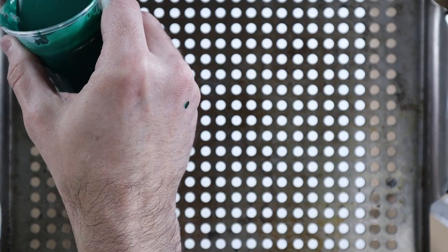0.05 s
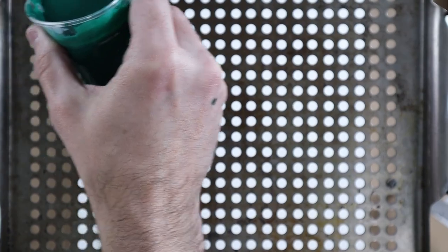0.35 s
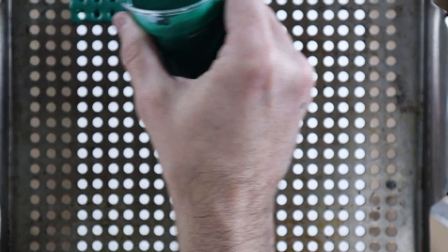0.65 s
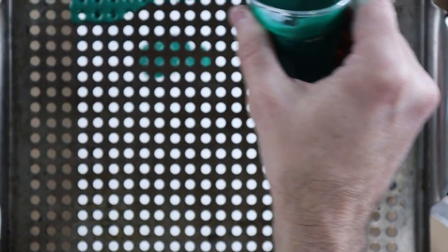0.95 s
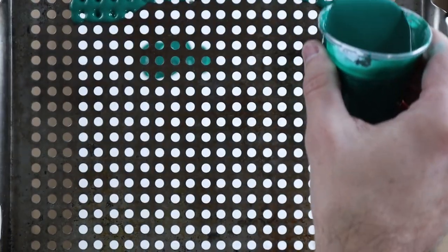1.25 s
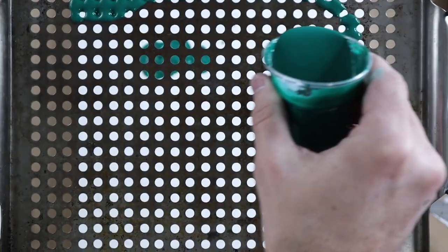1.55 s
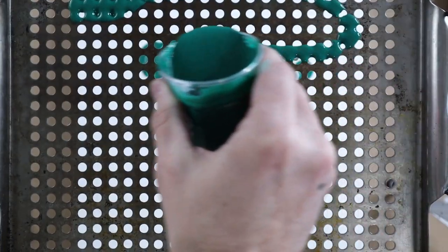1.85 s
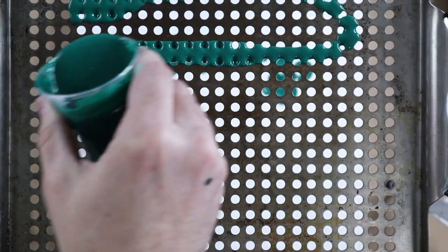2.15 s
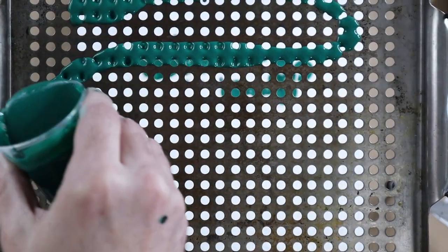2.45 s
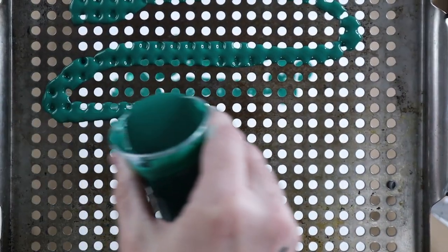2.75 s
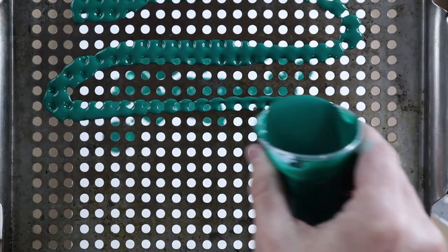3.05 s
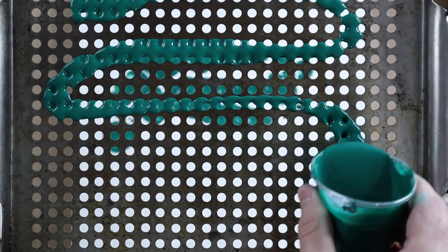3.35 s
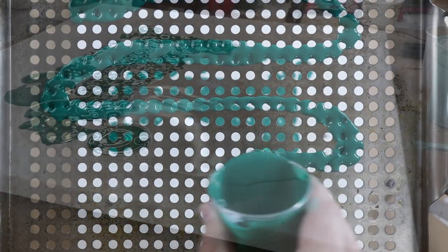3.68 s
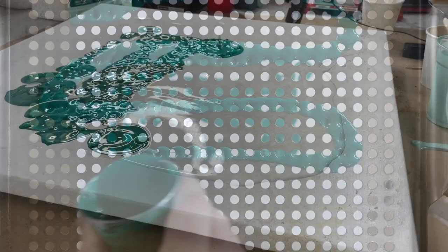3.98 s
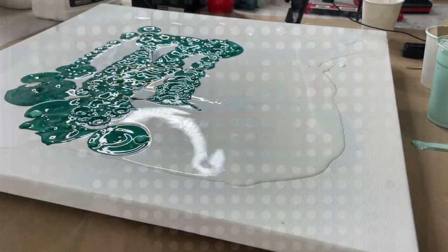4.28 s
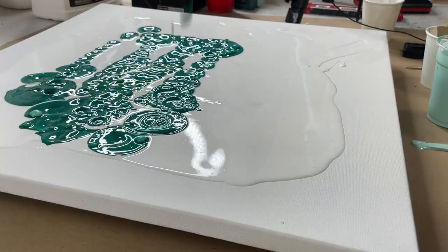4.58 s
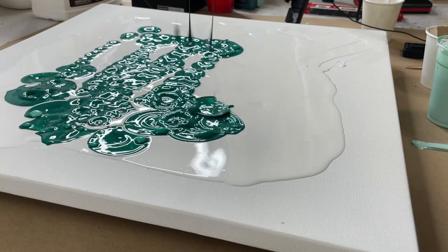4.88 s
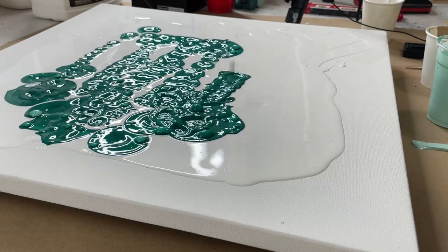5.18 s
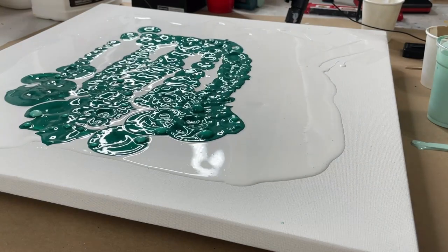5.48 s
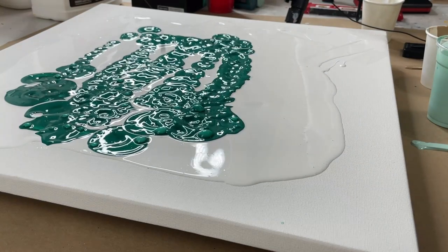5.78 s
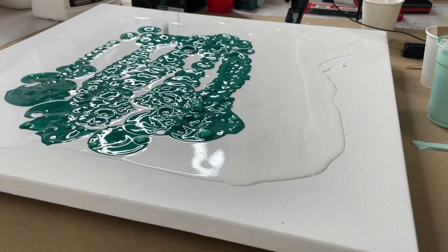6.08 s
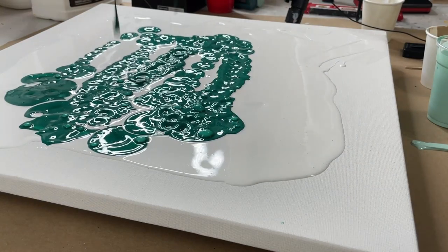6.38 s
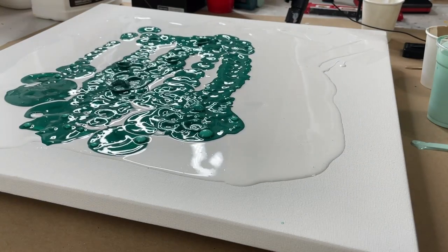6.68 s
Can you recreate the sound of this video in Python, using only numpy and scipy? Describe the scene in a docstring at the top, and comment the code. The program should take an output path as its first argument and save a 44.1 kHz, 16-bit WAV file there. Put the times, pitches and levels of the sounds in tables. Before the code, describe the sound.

Drops of paint patter and tap on a wet canvas like on a slack drum, growing busier as small bubbles burst.

```python
"""A small workroom, one microphone close to a wet, stretched canvas under a perforated pan of thick paint.
First a lone drop falls: it slaps the paint film, dents the cloth and sets it booming like a slack drum.
Just before one second the paint starts to run, and fine threads patter and crackle between the drops.
From about two and a half seconds the drops land harder. Trapped air bubbles burst with tiny rising
chirps all along, loudest midway and again near the end."""
import sys
import numpy as np
from scipy import signal
from scipy.fft import rfft, irfft, next_fast_len
from scipy.io import wavfile
from scipy.ndimage import uniform_filter1d

SR = 44100
rng = np.random.default_rng(int(sys.argv[2]) if len(sys.argv) > 2 else 0)


def store_pcm(level_fs):
    """Save levels as 16-bit WAV."""
    pcm = np.round(np.clip(level_fs, -1, 1) * 32767).astype(np.int16)
    wavfile.write(sys.argv[1], SR, np.atleast_2d(pcm).T)


N = 296793

# Room tone of the quiet workroom. Each row: frequency in Hz, relative level in dB.
ROOM_TONE = [(15, -45), (25, -13), (49, 9), (175, -7.5), (263, -4), (335, -7.5), (463, -10), (936, -19.5),
             (1650, -19.5), (4490, -24), (7110, -23), (16000, -31.5)]
# How long the room rings. Each row: frequency in Hz, seconds to fall 60 dB.
ROOM_DECAY = [(80, 1), (210, 0.39), (560, 0.36), (1500, 0.15), (4000, 0.2), (8000, 0.14), (14000, .16)]
# Colour of the room's reflections. Each row: frequency in Hz, relative level in dB.
ROOM_COLOUR = [(40, -12), (150, -10), (500, 2), (1000, 6), (2000, 7), (4000, 2), (8000, 7.5), (15000, 0)]
# How much paint is coming down. Each row: time in seconds, relative patter and crackle levels in dB.
FLOW = [(0.0, -79, -74.5), (0.71, -63, -80), (1.03, -58, -74), (1.46, -73.5, -81.5), (1.78, -56.5, -74.5),
        (2.02, -64, -80), (2.3, -67.5, -81), (2.62, -50, -73), (3.2, -63, -75.5), (3.71, -61, -73),
        (4.63, -56, -75), (5.16, -52.5, -66), (5.42, -58, -81.5), (6.17, -55, -71), (6.49, -60, -77.5),
        (6.73, -48.5, -67)]
# Colour of the sticky crackle. Each row: frequency in Hz, gain in dB.
CRACKLE_COLOUR = [(300, 20), (900, 17), (1800, 6.5), (3000, -3), (5000, -8), (7500, -6.5), (10000, -7),
                  (12000, -4.5), (16000, -14)]
# The clearest bursting bubbles. Each row: start in seconds, final pitch in Hz, relative ring level in dB.
CLEAR_BUBBLES = [(.434, 13800, -66), (.694, 12900, -53), (.827, 7000, -59.5), (1.009, 4140, -56.5),
                 (1.072, 11800, -57), (1.134, 12400, -45), (1.221, 11600, -56.5), (1.594, 5800, -54),
                 (1.622, 6000, -59), (1.856, 12400, -56), (2.29, 7300, -53.5), (2.348, 13200, -49.5),
                 (2.646, 14200, -49), (2.689, 8370, -45.5), (2.739, 5250, -50.5), (3.195, 11500, -55),
                 (3.221, 7460, -51), (3.465, 13100, -38.5), (3.512, 7230, -35.5), (3.665, 12000, -46.5),
                 (3.675, 6960, -41.5), (3.908, 12750, -48), (4.087, 8000, -52), (4.133, 11800, -47.5),
                 (4.168, 4700, -54.5), (4.259, 12240, -49), (4.418, 12300, -45.5), (4.421, 9130, -47.5),
                 (4.723, 8210, -46), (4.759, 5600, -47.5), (4.901, 3270, -51), (4.94, 11860, -46),
                 (5.091, 3420, -50), (5.094, 6750, -48), (5.123, 4400, -55), (5.142, 4850, -55),
                 (5.174, 8050, -53), (5.354, 12000, -48.5), (5.778, 5030, -50), (5.83, 5600, -46.5),
                 (5.855, 11900, -38), (5.965, 12900, -54), (6.022, 12800, -34.5), (6.116, 9100, -42),
                 (6.143, 11100, -47), (6.164, 7000, -35.5), (6.167, 12000, -34.5), (6.186, 7000, -50),
                 (6.309, 4650, -55.5), (6.577, 13100, -37.5), (6.689, 9340, -47)]
# Colour of a tearing bubble film. Each row: frequency in Hz, gain in dB.
SPIT_COLOUR = [(1500, -3), (4000, -11.5), (6000, -6.5), (8000, 8), (10000, 2.5), (12000, 11), (14500, -2),
               (16000, -14)]
# Modes of the paint-laden canvas. Each row: frequency in Hz, relative level in dB, seconds to fall 60 dB.
CANVAS_MODES = [(48.4, -23, 0.24), (72.9, -11.5, 0.25), (92.4, -11.5, 0.34), (107, -1, 0.16),
                (124.9, -0.5, 0.17), (147.6, -1.5, 0.2), (170.7, 2, 0.089), (205, -3, 0.12),
                (249.6, -1.5, 0.088), (275, -11.5, 0.15), (339, -21, 0.39), (357.6, -3.5, 0.39),
                (436.7, 2.5, 0.24), (455, 1, 0.35), (489.3, -1, 0.15), (555, -11, 0.089),
                (636.5, -4.5, 0.12), (692.4, 2.5, 0.095), (776, -11, 0.085), (894, -9.5, 0.05),
                (986, -7.5, 0.095), (1099, -19, 0.15)]
# A middling dent as the drips wander over the cloth. Each row: time in seconds, pitch in Hz.
DENT_PITCH = [(.3, 499), (.85, 568), (1.2, 500), (1.55, 400), (2.66, 465), (2.79, 699), (2.9, 614),
              (3.08, 433), (3.6, 353), (4.6, 418), (5.3, 349), (6.2, 461), (6.7, 423)]
# The big drops. Each row: start in seconds, then relative slap, dent and boom levels in dB.
BIG_DROPS = [(0.2849, -45.5, -45, -45.5), (0.6934, -75, -60.5, -55.5), (0.848, -40.5, -44.5, -58),
             (0.875, -42.5, -52, -45), (0.904, -40, -44.5, -53), (0.9321, -55, -52, -56),
             (1.0072, -46, -43.5, -52.5), (1.0392, -56, -57, -61), (1.1322, -43.5, -47, -50),
             (1.1638, -57, -47.5, -56.5), (1.2216, -47, -52.5, -81), (1.3032, -51.5, -48.5, -56.5),
             (1.4364, -44, -51, -53), (1.5486, -39, -46, -46.5), (1.6912, -44.5, -48.5, -53),
             (1.7256, -39.5, -48, -51), (1.7526, -39.5, -47, -51), (1.805, -51, -52, -64),
             (1.8372, -46, -48.5, -47), (1.8631, -42.5, -53, -67), (1.8918, -44.5, -47, -55),
             (1.9651, -51, -53, -60), (2.1962, -46, -58, -56), (2.271, -69, -43.5, -52.5),
             (2.3474, -59, -56.5, -64), (2.3857, -40, -45, -58), (2.3954, -37.5, -43.5, -53),
             (2.4468, -33, -40.5, -54), (2.5562, -40, -40, -52), (2.5643, -32.5, -48, -48),
             (2.5756, -44, -42, -51), (2.604, -51, -53, -53), (2.6446, -43, -45, -53),
             (2.6768, -35, -39.5, -50), (2.704, -39, -41, -49), (2.7565, -45, -41.5, -45),
             (2.7794, -33.5, -41, -52), (2.827, -47, -38.5, -50.5), (2.8444, -44, -55, -55),
             (2.8898, -37.5, -44.5, -48), (2.9568, -44.5, -44.5, -51), (2.9964, -42, -46, -68),
             (3.0061, -41, -43, -54), (3.0323, -34.5, -37.5, -49), (3.0583, -31, -34, -62),
             (3.0897, -31, -44.5, -50), (3.1157, -29.5, -42.5, -48), (3.1521, -35, -38.5, -55),
             (3.1929, -27, -38.5, -46.5), (3.2314, -58, -41, -48), (3.2809, -33, -46, -47.5),
             (3.3361, -34, -42, -58), (3.3793, -54, -46.5, -54), (3.4051, -42.5, -59, -67),
             (3.4197, -38, -61, -51), (3.4407, -35, -44, -49), (3.4629, -33, -45, -46.5),
             (3.5114, -35.5, -41, -43.5), (3.6174, -36, -42, -51), (3.6665, -41.5, -37, -45),
             (3.7377, -28.5, -36, -41), (3.8265, -41.5, -58, -51), (3.9059, -42.5, -46.5, -45),
             (4.0176, -47, -44.5, -47.5), (4.0665, -35, -44, -45.5), (4.1293, -34, -40.5, -42.5),
             (4.1661, -45, -51, -48.5), (4.1994, -39.5, -43, -48), (4.2452, -39, -42, -51),
             (4.2809, -39.5, -42.5, -44.5), (4.3325, -41, -43, -46), (4.4165, -57, -51, -53),
             (4.5197, -46, -48.5, -58), (4.5349, -39.5, -47.5, -46), (4.5493, -37, -44.5, -47),
             (4.6544, -38, -38.5, -54), (4.6853, -40.5, -44.5, -54), (4.7242, -41, -45.5, -48),
             (4.7563, -50, -47.5, -44.5), (4.8672, -41, -44.5, -47.5), (4.9012, -55, -46.5, -45),
             (4.9397, -22, -41.5, -40), (4.9846, -51, -44, -50), (5.0316, -42.5, -41.5, -54),
             (5.0593, -40, -46, -48), (5.0911, -42, -50, -48), (5.1212, -41, -71, -45),
             (5.1527, -42, -42, -42), (5.1771, -54, -43.5, -46), (5.22, -54, -37.5, -51),
             (5.2499, -43, -52, -43), (5.2882, -36.5, -39, -49), (5.3157, -48, -38.5, -49.5),
             (5.3531, -39, -42, -48), (5.4006, -46.5, -49.5, -49), (5.503, -46.5, -49.5, -55),
             (5.5572, -36.5, -46, -45.5), (5.6096, -37.5, -43, -50), (5.668, -35, -36.5, -49),
             (5.7017, -42.5, -46, -45), (5.83, -57, -41, -55), (5.8818, -37, -42, -55),
             (5.9424, -47, -46.5, -54), (5.9729, -42.5, -53, -59), (6.0204, -43, -60, -50.5),
             (6.0489, -41, -50, -69), (6.115, -45, -50.5, -62), (6.128, -34, -43.5, -64),
             (6.1384, -36.5, -44, -49.5), (6.1823, -45, -41, -46.5), (6.2807, -35.5, -48, -47.5),
             (6.4264, -45, -47.5, -56.5), (6.4569, -50, -56, -49), (6.5695, -38, -40.5, -49),
             (6.5779, -37, -47, -65), (6.631, -33.5, -41.5, -67), (6.6965, -45, -46.5, -62)]

FLOW_START_S = .8  # paint begins to run steadily through the holes
BUBBLE_CYCLES = 17.85  # every bubble rings for about as many cycles, so small ones are brief
SPIT_DB, SPIT_AT_HZ, SPIT_DB_PER_OCTAVE = -6.5, 8000, 4.5  # before colouring; small bubbles spit more
FIZZ_HZ, FIZZ_OCTAVES = 13550, 1.16  # the smallest faint bubble, and how far down the others reach
FIZZ_DB, FIZZ_SPREAD_DB = 16, 7.5  # their ring over the crackle level, and its range
DROPLET_SLAP_DB, DROPLET_DENT_DB, DROPLET_BOOM_DB = 4.5, 2, -2  # small drops, over the patter level
DROPLET_SPREAD_DB, SLAP_SPREAD_DB = 12, 10  # range of their sizes, and of how flat they land
MIDDLING_DENT_DB, DENT_DB_PER_OCTAVE = -43, 60.5  # a heavier drop dents wider and sounds lower
DROP_DELAY_S = .001  # every drop sounds this long after its listed start


def amp(db):
    """Decibels to gain."""
    return 10 ** (np.asarray(db) / 20)


def unit(x):
    """Scaled to rms 1."""
    return x / np.sqrt(np.mean(x ** 2) + 1e-20)


def along(points, hz):
    """(Hz, value) points read on a log axis."""
    f, v = np.transpose(points)
    return np.interp(np.log(hz + 1), np.log(f + 1), v)


def filtered(x, response):
    """x with its spectrum weighted by response(Hz)."""
    m = next_fast_len(N + SR // 2)
    return irfft(rfft(x, m) * response(np.fft.rfftfreq(m, 1 / SR)), m)[:N]


def place(times, sounds):
    """Sum of short sounds, one a row, each starting at its time."""
    index = np.round(np.reshape(times, (-1, 1)) * SR).astype(int) + np.arange(sounds.shape[1])
    return np.bincount(np.maximum(index, 0).ravel(), sounds.ravel(), N)[:N]


def room_tone():
    """The workroom's faint, steady noise, mostly low rumble."""
    return amp(-73) * unit(filtered(rng.standard_normal(N), lambda f: amp(along(ROOM_TONE, f))))


def reflections(x, stretches=14):
    """The room's short answer changes as the drops move: each stretch of time has its own tail."""
    hz, t, noise = signal.stft(rng.standard_normal((stretches, SR // 2)), SR, nperseg=256)
    tail_db = along(ROOM_COLOUR, hz)[:, None] - 60 * t / along(ROOM_DECAY, hz)[:, None]
    tails = signal.istft(noise * amp(tail_db), SR, nperseg=256)[1]
    tails = tails * (1 - np.exp(-np.arange(tails.shape[1]) / SR / 0.00033))
    tails = tails / np.linalg.norm(tails, axis=1, keepdims=True)
    size = -(-N // stretches)
    pieces = np.pad(x, (0, stretches * size - N)).reshape(stretches, size)
    return place(np.arange(stretches) * size / SR, signal.fftconvolve(pieces, tails, axes=1))


def flow_at(times):
    """Relative patter and crackle levels in dB at these times."""
    knots, patter_db, crackle_db = np.transpose(FLOW)
    return np.interp(times, knots, patter_db), np.interp(times, knots, crackle_db)


def trickle(chance):
    """Uneven times through the pour, one in each equal share of it."""
    return FLOW_START_S + (N / SR - FLOW_START_S) * (np.arange(len(chance)) + chance) / len(chance)


def plinks(hz, cycles):
    """Tiny wet cavities, one a row, each ringing for a few cycles as its pitch lifts."""
    turns = hz * np.arange(SR // 100) / SR
    age = turns / cycles
    return np.sin(2 * np.pi * turns * (1 + 0.14 * np.tanh(age))) * np.exp(-age) * (1 - np.exp(-4 * age))


def dent(hz, t60, phase):
    """The cloth gives way under a drop and swings back, dying quickly."""
    t = np.arange(SR // 40) / SR
    return -np.sin(2 * np.pi * hz * t + phase) * amp(-60 * t / t60) * (1 - np.exp(-t / .00006))


def ring(modes, count, attack_s):
    """Canvas ringing of equal power for count drops; each landing spot weights the modes anew."""
    t = np.arange(SR // 3) / SR
    hz, db, t60 = np.transpose(modes)[:, :, None]
    swings = amp(db - 60 * t / t60) * np.exp(2j * np.pi * hz * t) * (1 - np.exp(-t / attack_s))
    rings = rng.standard_normal((count, 2 * len(modes))) @ np.vstack([swings.real, swings.imag])
    return rings / np.sqrt(np.mean(rings[:, :SR // 25] ** 2, axis=1, keepdims=True))


def threads():
    """Thin strands fold onto the wet canvas: soft little dents and a sticky crackle."""
    now = np.arange(N) / SR
    patter_db, crackle_db = flow_at(now)
    when, pitch, size = rng.random((420, 3)).T[:, :, None]
    times, size_db = when * N / SR, -14 * size
    patter = place(times, amp(size_db) * dent(300 * 2.8 ** pitch, t60=0.0068, phase=1.0))
    patter += place(times, amp(size_db - 22.5) * ring(CANVAS_MODES, len(times), attack_s=0.006))
    when, pitch, size = rng.random((4200, 3)).T[:, :, None]
    snaps = amp(-30 * size) * plinks(2000 + 12000 * pitch, cycles=1.2) * (.25 + pitch)
    crackle = filtered(place(when * N / SR, snaps), lambda f: amp(along(CRACKLE_COLOUR, f)))
    running = np.interp(now, [FLOW_START_S - .15, FLOW_START_S], [.2, 1])  # faint until the paint runs
    return running * (amp(patter_db - 8.5) * unit(patter) + amp(crackle_db + 1.5) * unit(crackle))


def bursting(faint_count):
    """Faint bubbles that follow the crackle, plus the clear ones; rows as in CLEAR_BUBBLES."""
    when, pitch, size = rng.random((faint_count, 3)).T
    times = trickle(when)
    hz = FIZZ_HZ / 2 ** (FIZZ_OCTAVES * pitch ** 2)
    ring_db = flow_at(times)[1] + FIZZ_DB + FIZZ_SPREAD_DB * (size - .5)
    return np.vstack([np.transpose([times, hz, ring_db]), CLEAR_BUBBLES])


def bubbles(bursts):
    """As a bubble's film tears it spits, and its cavity rings with a quickly, unevenly rising pitch."""
    start, hz, ring_db = bursts.T[:, :, None]
    t = np.arange(SR // 40) / SR
    age = t * hz / BUBBLE_CYCLES
    ragged = unit(uniform_filter1d(rng.standard_normal(age.shape), size=12, axis=1))
    pitch = hz * (1 - 0.66 * np.exp(-age / 0.207)) * (1 + 0.092 * ragged)
    swell = (2 * age) ** 2 * np.exp(2 - 4 * age)
    chirps = place(start, amp(ring_db + 1) * swell * np.sin(2 * np.pi * np.cumsum(pitch, axis=1) / SR))
    spit_db = ring_db + SPIT_DB + SPIT_DB_PER_OCTAVE * np.log2(hz / SPIT_AT_HZ)
    tear = amp(-60 * t / 0.015) * (1 - np.exp(-t / 0.00076))
    spits = place(start + 0.00044, amp(spit_db) * tear * rng.standard_normal(age.shape))
    return chirps + filtered(spits, lambda f: amp(along(SPIT_COLOUR, f)))


def falling(small_count):
    """Small drops that grow with the flow, plus the big ones, each given a dent pitch."""
    when, size, flat = rng.random((small_count, 3)).T
    times = trickle(when)
    size_db = flow_at(times)[0] + DROPLET_SPREAD_DB * (size - .5)
    flat_db = SLAP_SPREAD_DB * (flat - .5)
    small = np.transpose([times, size_db + DROPLET_SLAP_DB + flat_db,
                          size_db + DROPLET_DENT_DB, size_db + DROPLET_BOOM_DB])
    start, slap_db, dent_db, boom_db = np.vstack([small, BIG_DROPS]).T
    octaves = (MIDDLING_DENT_DB - dent_db) / DENT_DB_PER_OCTAVE
    scatter = np.exp(0.141 * rng.standard_normal(len(start)))
    dent_hz = np.interp(start, *np.transpose(DENT_PITCH)) * 2 ** octaves * scatter
    return np.transpose([start + DROP_DELAY_S, slap_db, dent_hz, dent_db, boom_db])


def slaps(drops):
    """Drops hit the paint film: a pressure spike, a splash with its own colour, then flung droplets."""
    start, slap_db = drops.T[:2, :, None]
    t = np.arange(SR // 30) / SR
    lead_s = .00015
    width_s = .00004 * np.exp(rng.uniform(-.6, .7, start.shape))
    out = place(start - lead_s, amp(slap_db) * np.exp(-((t - lead_s) / width_s) ** 2))
    spray_db = -24 + 11 * rng.random(start.shape)
    spray = amp(-60 * t / .018) * rng.standard_normal((len(start), len(t)))
    out += place(start, amp(slap_db + spray_db) * spray)
    for centre_hz, db in [(1000, -13), (2200, -13), (5000, -19)]:
        hz = centre_hz * np.exp(0.23 * rng.standard_normal(start.shape))
        out -= place(start, amp(slap_db + db) * plinks(hz, cycles=1.3))
    for _ in range(8):  # flung droplets: the later, the fainter
        late, pitch, size = rng.random((len(start), 3)).T[:, :, None]
        droplets = amp(slap_db - 19.5 - 4.7 * size - 29 * late) * plinks(1000 * 10 ** pitch, cycles=1.7)
        out += place(start + .002 + .07 * late ** 2, droplets)
    return out


def canvas_drum(drops):
    """Each drop dents the cloth; the wave comes back from the frame and the whole canvas rings."""
    start, slap_db, hz, dent_db, boom_db = drops.T[:, :, None]
    push = amp(0.24 * slap_db + 0.83 * dent_db + 10.5)
    overtone = amp(-19.5) * dent(1.947 * hz, t60=0.052, phase=1.0)
    dents = place(start, push * (dent(hz, t60=0.019, phase=0.43) + overtone))
    # the wet cloth carries short waves fastest, so the rebound falls in pitch
    t = np.arange(SR // 16) / SR
    age = t / (0.0104 * np.exp(0.16 * rng.standard_normal(start.shape)))
    pitch = (135 + 0.919 * hz * np.exp(-age / 1.192)) * np.exp(0.095 * rng.standard_normal(start.shape))
    swell = amp(0.4 * dent_db + 0.79 * boom_db + 2) * (age * np.exp(1 - age)) ** 3
    rebounds = place(start, swell * np.sin(2 * np.pi * np.cumsum(pitch, axis=1) / SR))
    # the slow, wide modes take longer to build up than the small ones
    wide = [mode for mode in CANVAS_MODES if mode[0] < 260]
    small = [mode for mode in CANVAS_MODES if mode[0] >= 260]
    boom = place(start, amp(boom_db - 4.5) * ring(wide, len(start), attack_s=0.0083))
    tone = place(start, amp(dent_db - 15) * ring(small, len(start), attack_s=0.00044))
    return dents + rebounds + boom + tone


def scene():
    """Paint on the canvas close to the microphone, the workroom behind it, in mono."""
    drops = falling(small_count=90)
    close = slaps(drops) + canvas_drum(drops) + threads() + bubbles(bursting(faint_count=46))
    return (close + reflections(amp(-7.5) * close) + room_tone())[None]


def record(dry):
    """The microphone thins the deepest bass and keeps nothing above its band limit."""
    low_cut_hz, top_hz = 38, 16200
    thinned = signal.sosfilt(signal.butter(3, low_cut_hz, "high", fs=SR, output="sos"), dry[0])
    return filtered(thinned, lambda f: 1 / np.sqrt(1 + (f / top_hz) ** 200))[None]


dry = scene()
out = record(dry)
store_pcm(out)
```